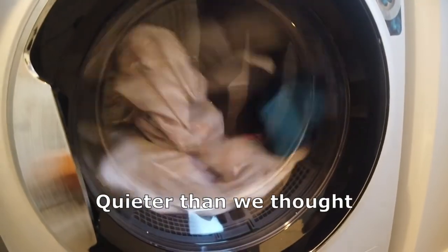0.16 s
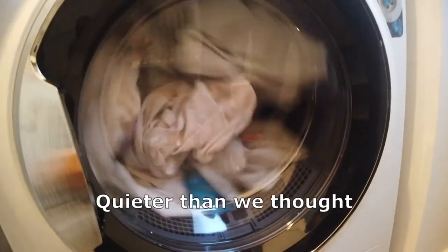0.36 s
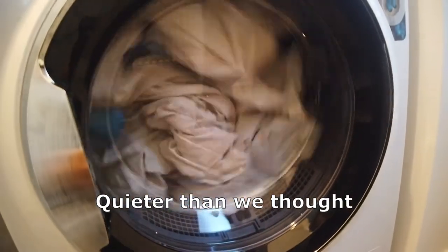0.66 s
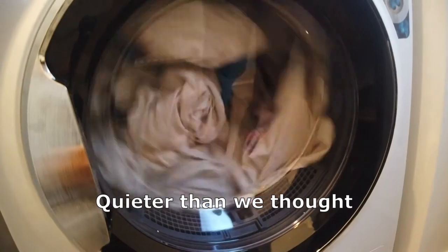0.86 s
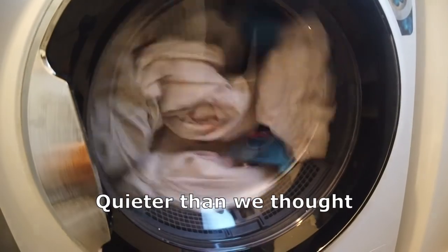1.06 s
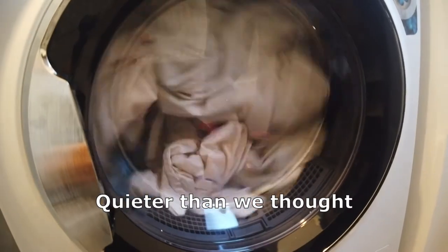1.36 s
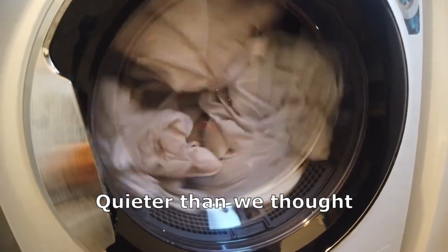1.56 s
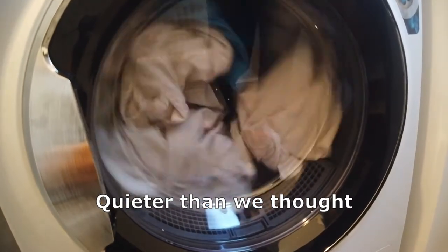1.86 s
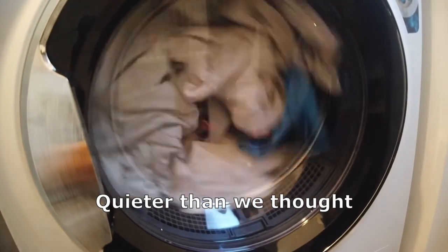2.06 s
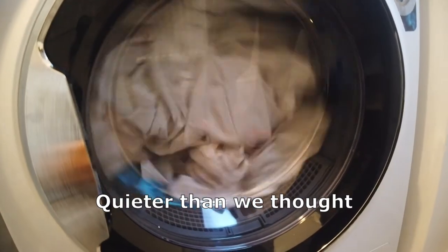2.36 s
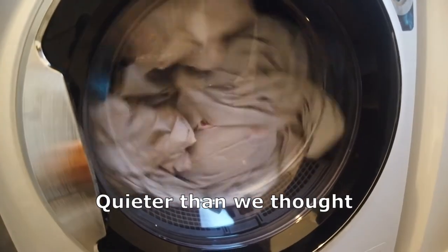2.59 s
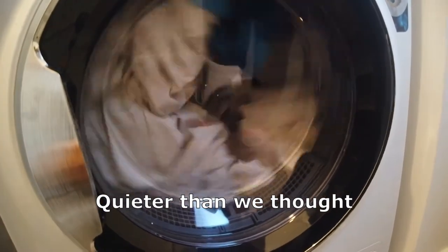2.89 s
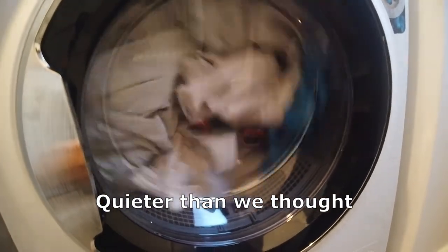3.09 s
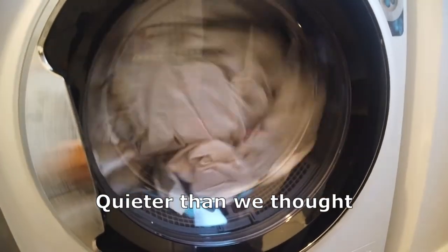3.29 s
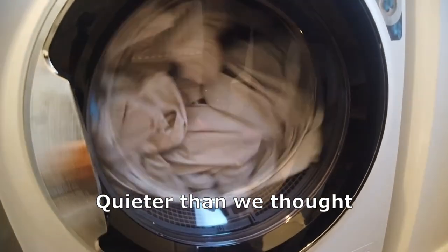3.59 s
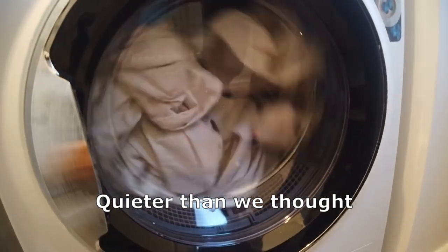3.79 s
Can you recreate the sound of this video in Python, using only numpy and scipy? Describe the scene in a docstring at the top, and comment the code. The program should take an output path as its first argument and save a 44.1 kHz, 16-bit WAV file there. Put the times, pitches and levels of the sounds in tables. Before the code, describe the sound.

A tumble dryer runs steadily indoors, heard close in stereo: low boomy drum rumble and motor hum, irregular soft laundry thuds, blower whirr, faint cloth swishes and a thin high hiss.

```python
"""A low drum rumble and boom run throughout, with soft thuds among them: a tumble dryer turns laundry close by.
Shaped noise makes the rumble, drone, blower whirr and rush, and swish of cloth; each thud rings drum modes.
Sine tones make the boom, the motor hum and whine that sway with the load, and the steady blower tones.
A thin high hiss, probably the drum's sliding seal, is shaped noise that swells and fades;
its whistles and faint squeak are very narrow bands of noise."""
import sys
import numpy as np
from scipy import signal
from scipy.fft import rfft, irfft, next_fast_len
from scipy.io import wavfile
from scipy.ndimage import uniform_filter1d, map_coordinates

SR = 44100
rng = np.random.default_rng(int(sys.argv[2]) if len(sys.argv) > 2 else 0)


def pcm_store(signal):
    """Save signal as 16-bit PCM."""
    levels = np.round(np.clip(np.atleast_2d(signal), -1, 1) * 32767)
    wavfile.write(sys.argv[1], SR, levels.astype(np.int16).T)


N = 173754

# Spectra are relative: each sound is scaled to its level afterwards.
# lower hiss band: (frequency [Hz], density [dB per Hz])
HISS_SPECTRUM = [(5000, -35), (5900, -17.5), (6900, -9), (7300, -1), (7600, 4.5), (8000, 3), (8150, -3),
                 (8600, -1.5), (8900, -13.5), (9500, -19.5), (11000, -20), (12000, -28), (13500, -31),
                 (14600, -28), (15600, -20.5)]
# top hiss band: (frequency [Hz], density [dB per Hz])
TOP_SPECTRUM = [(9750, -25), (10230, -1), (10600, -8), (11300, -23)]
# left-right correlation of the hiss: (frequency [Hz], likeness [-1 to 1])
HISS_LIKENESS = [(5000, -0.077), (8000, -0.18), (9300, 0.58), (11000, -0.022), (15000, 0.81)]
# course of the hiss, before HISS_DB is added: (time [s], level [dB])
HISS_LEVEL = [(0, -52.5), (.9, -52.7), (1.9, -52), (2.9, -52), (3.4, -52.5), (3.8, -51)]
# thin whistles that come and go: (centre [s], 1/e half-length [s], frequency [Hz], level before rubbing [dB])
WHISTLES = [(.5, .7, 7243, -60), (1.65, 1.8, 7560, -55), (1.8, .55, 8010, -58), (2.624, .07, 7525, -52),
            (3.496, 0.88, 7660, -56), (3.7, 0.36, 7243, -59)]
# harder rubbing of the seal, weighted for the top hiss band, the whistles and the squeak: (time [s], lift [dB])
RUBS = [(1.215, 7.5), (1.38, 4), (2.92, 4.5), (3.655, 6)]
# blower whirr: (frequency [Hz], density [dB per Hz])
WHIRR_SPECTRUM = [(380, -7.5), (490, -10.5), (545, 0), (600, -1.5), (645, -5.5), (790, -5.5), (930, -10.5),
                  (1010, -16.5), (1400, -37)]
# blower rush, common to both ears: (frequency [Hz], density [dB per Hz])
RUSH_MID_SPECTRUM = [(700, -22), (1080, -1.5), (1300, -1.5), (1550, 2), (1660, 0), (1780, 2.5), (1960, -4),
                     (2050, -1), (2300, -10.5), (2650, -17), (3500, -18.5), (3870, -14), (4200, -21),
                     (4700, -25), (6000, -27.5)]
# blower rush, wide part: (frequency [Hz], density [dB per Hz])
RUSH_SIDE_SPECTRUM = [(35, -6), (150, -24), (750, -12), (1250, -12), (2250, -9.8), (2760, -10.5),
                      (3300, -17.5), (5500, -25.5)]
# swish of sliding cloth: (frequency [Hz], density [dB per Hz])
CLOTH_SPECTRUM = [(400, -30), (700, -7), (1400, -9.5), (1790, 0), (2200, -19.5)]
# cloth sliding over the drum wall: (centre [s], 1/e half-length [s], lift that sets the swish [dB])
SWISHES = [(0.137, 0.092, 7), (0.86, 0.1, 5.5), (1.425, 0.16, 3.5), (1.843, 0.038, 5.5), (2.7, 0.24, 3.7),
           (3.55, 0.18, 6.8)]
# steady blower tones: (multiple of the blade rate, level before TONE_LEVEL [dB])
BLADE_TONES = [(2, -56.5), (3, -54), (4, -57.5)]
# shared course of motor whine and blower tones: (time [s], relative level [dB])
TONE_LEVEL = [(3.55, 0), (3.9, -9.5)]
# motor hum: (multiple of HUM_HZ, level without load [dB], change per dB of load [dB])
HUM = [(1, -35, 0.55), (2, -40, -0.18)]
# load on the motor, weighted for each hum tone: (time [s], load [dB])
MOTOR_LOAD = [(.7, 2), (1.3, -0.5), (2.35, -4.5), (2.65, 3.5), (3.35, 5.5), (3.94, -1.5)]
# shaft speed, sagging and recovering as the drum lifts and drops the load: (time [s], speed [turns/s])
SHAFT_SPEED = [(.15, 45.58), (.38, 46.0), (.66, 45.65), (.92, 45.88), (1.35, 45.46), (1.73, 46.17),
               (2.15, 45.42), (2.48, 45.72), (2.76, 46.13), (3.22, 45.33), (3.68, 46.3)]
# motor whine: (multiple of the shaft speed, level before TONE_LEVEL [dB])
WHINE = [(12, -51.5), (15, -57), (16, -54), (24, -55), (25, -62)]
# soft landings of the laundry: (onset [s], peak level [dB])
THUDS = [(.135, -24), (0.446, -26), (.628, -16.5), (0.73, -20), (0.785, -20), (1.004, -22.5), (1.096, -22),
         (1.599, -19), (1.735, -19.5), (1.772, -17), (1.952, -21.5), (2.499, -20.5), (2.906, -21)]
# modes of the struck drum, before random detuning: (frequency [Hz], relative level [dB])
DRUM_MODES = [(66, -17.5), (75, 7.5), (84, -18.5), (172, -8.5), (222, -8.5)]
# drum rumble: (frequency [Hz], density [dB per Hz])
RUMBLE_SPECTRUM = [(20, -11), (31, -1), (48, -9), (62, 2), (74, 1), (90, -5.5), (110, -2.5), (140, -12),
                   (220, -25)]
# drum rumble: (time [s], level [dB])
RUMBLE_LEVEL = [(0, -32), (1.8, -35), (2.55, -32.5), (3.94, -32)]
# drone of the cabinet panels: (frequency [Hz], density [dB per Hz])
DRONE_SPECTRUM = [(115, -5.5), (145, -13), (170, 2), (225, -1), (298, -8.5), (365, -12), (395, -10),
                  (445, -17.5), (600, -62)]
# drone of the cabinet panels: (time [s], level [dB])
DRONE_LEVEL = [(0, -35.5), (.65, -33.3), (1.1, -37), (1.45, -33), (2.05, -33), (2.45, -36.5), (2.9, -31.5),
               (3.6, -37), (3.94, -34)]
# boom of the drum: (time [s], level [dB])
BOOM_LEVEL = [(.5, -32), (1.1, -35), (2.15, -41), (2.8, -35.5)]

WHIRR_DB, RUSH_DB, CLOTH_DB = -42, -44.5, -49.5
HISS_DB, TOP_DB = 5, -63.5  # HISS_DB is an offset to HISS_LEVEL
RUB_S = 0.037  # 1/e half-length of a rub
WHISTLE_WIDTH_HZ, WHISTLE_LIKENESS = 11, 0.26  # half-width at half gain; left-right correlation
SQUEAK_HZ, SQUEAK_WIDTH_HZ, SQUEAK_DB = 10260, 23, -68
HUM_HZ, BLADE_HZ = 100.27, 267.6  # twice the mains frequency; blade rate of the blower
BOOM_HZ = 75.96  # strongest low drum resonance, kept ringing by the rolling load
THUD_RISE_S, THUD_T60_S = 0.0073, 0.19
DIRECT_SHARE = 0.25  # share of the side sound's power that comes straight from the machine
SIDE_LAG_S, BODY_LAG_S = .00009, .00006  # delays of the left port for direct side sound and for mono sound
CUT_HZ = 15800


def amp(db):
    """Decibel law: level in dB to amplitude gain."""
    return 10 ** (np.asarray(db) / 20)


def unit(x):
    """Normalization of a signal to rms 1."""
    return x / np.sqrt(np.mean(x ** 2) + 1e-20)


def along(points, hz):
    """Interpolation of (frequency, value) points on a logarithmic frequency axis."""
    f, v = np.transpose(points)
    return np.interp(np.log(hz + 1), np.log(f + 1), v)


def slope(points, hz):
    """Spectral envelope: gain through the points, falling steeply above the last one."""
    return amp(along(points, hz)) / np.maximum(hz / points[-1][0], 1) ** 6


def curve(rows):
    """Linear interpolation of (time, value) points, one value per sample."""
    return np.interp(np.arange(N) / SR, *np.transpose(rows))


def swell(s, length):
    """Gaussian envelope of height 1 around time s."""
    return np.exp(-((np.arange(N) / SR - s) / length) ** 2)


def wobble(rate):
    """Slow random modulation: a spline through random knots, rate knots a second."""
    knots = rng.standard_normal(int(N * rate / SR) + 4)
    return map_coordinates(knots, [np.arange(N) * rate / SR])


def noise(gain, channels=1):
    """Spectral shaping of white noise; two channels are mid and side, partly coupled by the port delay."""
    m = next_fast_len(N + SR // 4)
    hz = np.fft.rfftfreq(m, 1 / SR)
    z = rfft(rng.standard_normal((channels, m)))
    if channels == 2:
        share = np.clip(DIRECT_SHARE, 0, 1)
        # the delay only sets which way the mid is turned by a quarter cycle
        lagged = -1j * np.sign(np.sin(2 * np.pi * hz * SIDE_LAG_S)) * z[0]
        z[1] = np.sqrt(1 - share) * z[1] + np.sqrt(share) * lagged
    return irfft(z * gain(hz), m)[:, :N]


def band(spectrum):
    """Coloured noise: mono, rms 1, with the given spectrum."""
    return unit(noise(lambda hz: slope(spectrum, hz)))


def stereo(gain, likeness):
    """Interchannel correlation: the mid-side balance sets left-right likeness by frequency; rms 1."""
    def mid_side_gain(hz):
        angle = np.arccos(np.clip(likeness(hz), -1, 1)) / 2
        return gain(hz) * np.array([np.cos(angle), np.sin(angle)])
    mid, side = noise(mid_side_gain, channels=2)
    return unit(np.array([mid + side, mid - side]))


def steadied(x, window_s, share):
    """Level compression: a share of the noise's slow chance swells is evened out."""
    power = np.abs(uniform_filter1d(np.mean(x ** 2, axis=0), max(int(window_s * SR), 8)))
    return unit(x / (power + 1e-9) ** (np.clip(share, 0, 1) / 2))


def patchy(x, depth_db):
    """Time-frequency modulation: smooth patches of random gain, shared by all channels."""
    z = signal.stft(x, nperseg=1024)[2]
    field = uniform_filter1d(rng.standard_normal(z.shape[1:]), size=4, axis=0)
    field = uniform_filter1d(field, size=9, axis=1)
    modulated = signal.istft(z * amp(depth_db * unit(field)), nperseg=1024)[1]
    return unit(modulated[:, :N])


def line(hz, db, waver_db, drift):
    """Phase accumulation: a tone of fixed or moving pitch with wavering level and phase (drift in turns)."""
    turns = np.cumsum(hz * np.ones(N)) / SR + rng.random() + drift * wobble(6)
    level_db = db + waver_db * wobble(5.075)
    return np.sqrt(2) * amp(level_db) * np.sin(2 * np.pi * turns)


def whistle(hz, width_hz):
    """Frictional excitation: a narrow resonance kept ringing by rubbing, as narrow-band noise."""
    return stereo(lambda f: 1 / (1 + ((f - hz) / width_hz) ** 2), lambda f: WHISTLE_LIKENESS + 0 * f)


def ports(x):
    """Interchannel time difference: mono sound reaches the left of two microphone ports a little later."""
    hz = np.fft.rfftfreq(N, 1 / SR)
    return irfft(rfft(x) * np.exp(np.outer([-1j, 1j], np.pi * hz * BODY_LAG_S)), N)


def hiss():
    """Friction noise: two hiss bands flutter at random; top band, whistles and squeak grow with rubbing."""
    likeness = lambda hz: along(HISS_LIKENESS, hz)
    level = curve(HISS_LEVEL)
    swing_db = level - level.mean()
    rub_db = sum(db * swell(s, RUB_S) for s, db in RUBS)
    flutter_db = 0.75 * wobble(23.5)

    low = patchy(stereo(lambda hz: slope(HISS_SPECTRUM, hz), likeness), depth_db=2.5)
    low = amp(level + HISS_DB + flutter_db) * low
    top_db = TOP_DB + 0.46 * rub_db + 1.1 * swing_db + flutter_db
    high = amp(top_db) * stereo(lambda hz: slope(TOP_SPECTRUM, hz), likeness)

    whistles = sum(amp(db) * swell(s, length) * whistle(hz, WHISTLE_WIDTH_HZ)
                   for s, length, hz, db in WHISTLES)
    squeak_db = SQUEAK_DB + 1.76 * rub_db + swing_db
    squeak = amp(squeak_db) * whistle(SQUEAK_HZ, SQUEAK_WIDTH_HZ)
    return low + high + amp(0.5 * rub_db) * whistles + squeak


def blower():
    """Flow noise and blade-rate tones: whirr, brighter rush and harmonics, joined by sliding cloth."""
    lift_db = sum(db * swell(s, length) for s, length, db in SWISHES)
    whirr = amp(WHIRR_DB + 0.24 * lift_db) * patchy(band(WHIRR_SPECTRUM), depth_db=0.83)

    mid, side = noise(lambda hz: np.array([slope(RUSH_MID_SPECTRUM, hz), slope(RUSH_SIDE_SPECTRUM, hz)]),
                      channels=2)
    rush = patchy(np.array([mid + side, mid - side]), depth_db=1.5)
    rush = amp(RUSH_DB + 0.76 * wobble(50)) * rush

    # the power gained by the lift goes to the cloth
    swish = np.sqrt(np.abs(amp(2 * lift_db) - 1))
    cloth = amp(CLOTH_DB) * swish * patchy(band(CLOTH_SPECTRUM), depth_db=0.5)
    blades = sum(line(k * BLADE_HZ, db + curve(TONE_LEVEL), waver_db=3.0, drift=0.13)
                 for k, db in BLADE_TONES)
    return ports(whirr + blades) + rush + cloth


def motor():
    """Magnetic hum and shaft harmonics: the hum level follows the load, the whine pitch the shaft speed."""
    load = curve(MOTOR_LOAD)
    hum = sum(line(k * HUM_HZ, db + follows * load, waver_db=1.5, drift=0.018)
              for k, db, follows in HUM)
    speed = uniform_filter1d(curve(SHAFT_SPEED), size=SR // 8)
    whine = sum(line(k * speed, db + curve(TONE_LEVEL), waver_db=4.0, drift=0.12) for k, db in WHINE)
    return hum + whine


def laundry():
    """Modal excitation: each soft landing swells quickly and rings the drum's low modes."""
    out, t = np.zeros(N + SR), np.arange(SR // 2) / SR
    shape = (1 - np.exp(-t / THUD_RISE_S)) * amp(-60 * t / THUD_T60_S)
    hz, level = np.transpose(DRUM_MODES)
    for s, db in THUDS:
        detune, colour, phase = rng.standard_normal((3, len(hz)))
        turns = np.outer(hz * (1 + 0.046 * detune), t) + phase[:, None]
        ring = shape * (amp(level + 1.2 * colour) @ np.sin(2 * np.pi * turns))
        out[round(s * SR):][:len(t)] += amp(db) * ring / np.abs(ring).max()
    return out[:N]


def drum():
    """Forced vibration: the rolling drum rumbles and booms, and the cabinet panels drone above it."""
    rumble = amp(curve(RUMBLE_LEVEL)) * steadied(band(RUMBLE_SPECTRUM), window_s=0.13, share=0.51)
    drone = amp(curve(DRONE_LEVEL)) * steadied(band(DRONE_SPECTRUM), window_s=0.13, share=0.79)
    boom = line(BOOM_HZ, curve(BOOM_LEVEL), waver_db=0.5, drift=0.12)
    return rumble + drone + boom


def scene():
    """Superposition: the whole machine, its bass near the centre and its treble wide."""
    return hiss() + blower() + ports(motor() + laundry() + drum())


def record(dry):
    """Band limitation: the recorder keeps nothing above its cutoff."""
    m = next_fast_len(N + SR // 4)
    passed = np.fft.rfftfreq(m, 1 / SR) < CUT_HZ
    return irfft(rfft(dry, m) * passed, m)[:, :N]


dry = scene()
out = record(dry)
pcm_store(out)
```